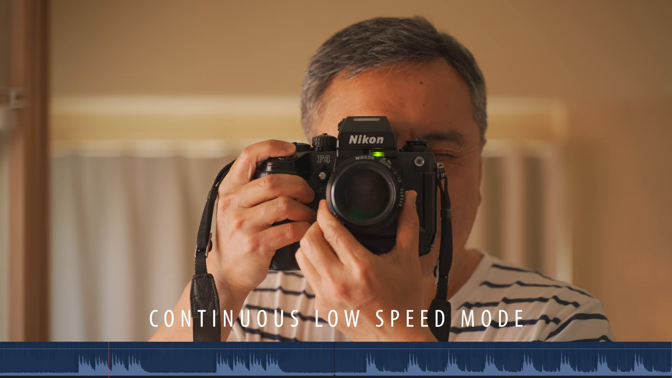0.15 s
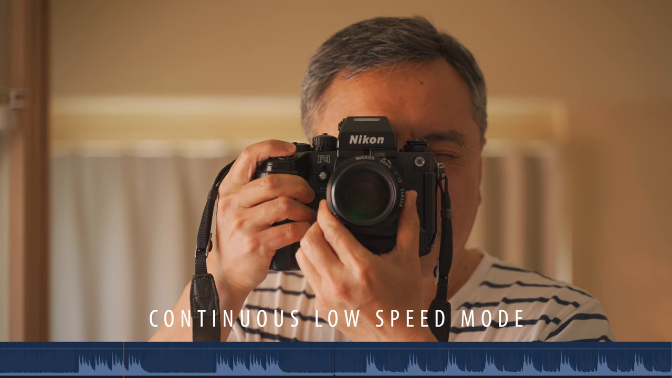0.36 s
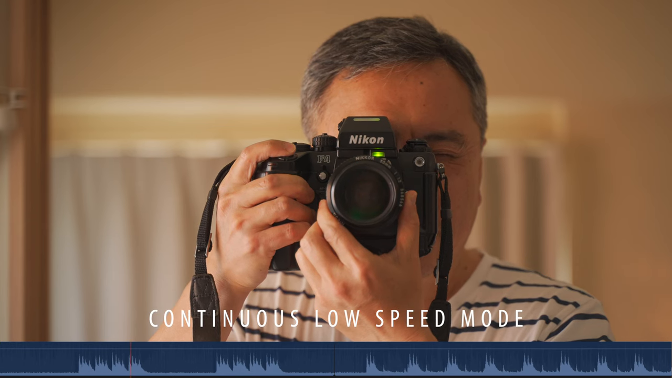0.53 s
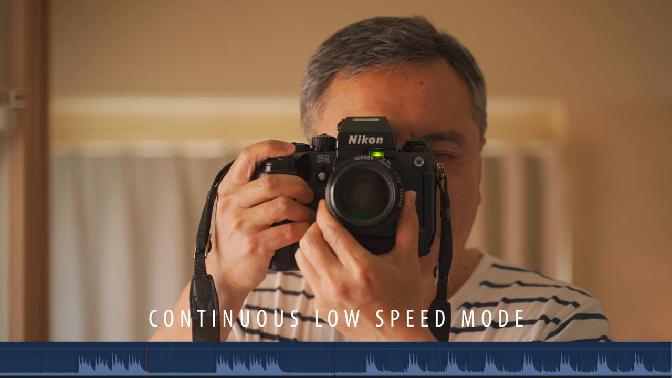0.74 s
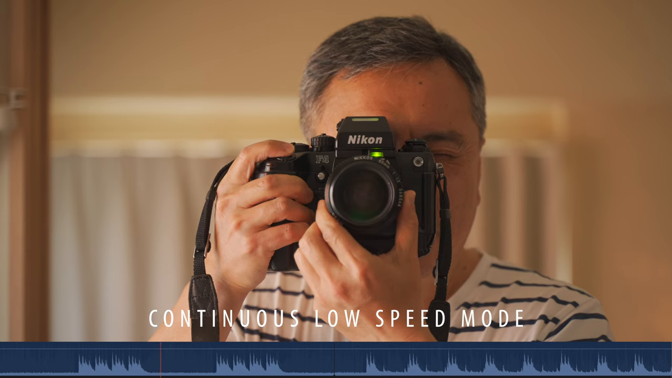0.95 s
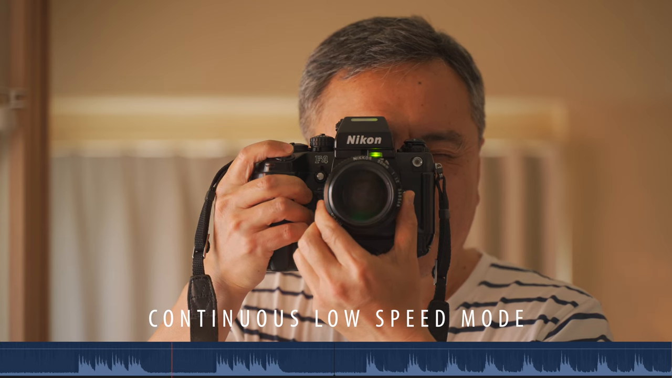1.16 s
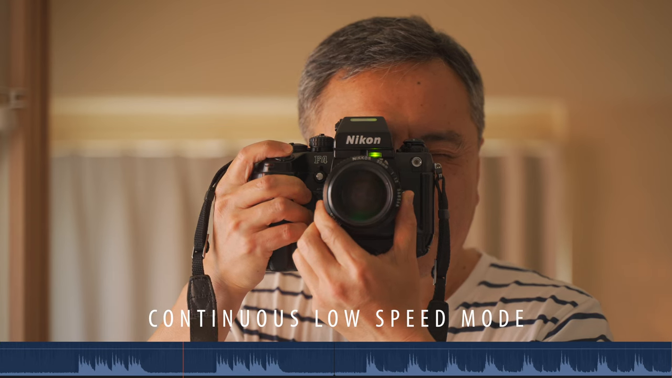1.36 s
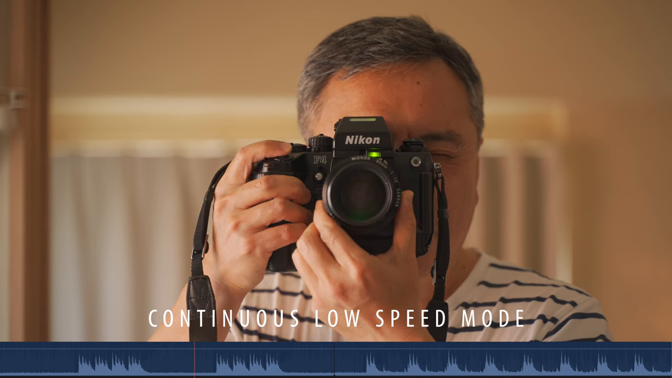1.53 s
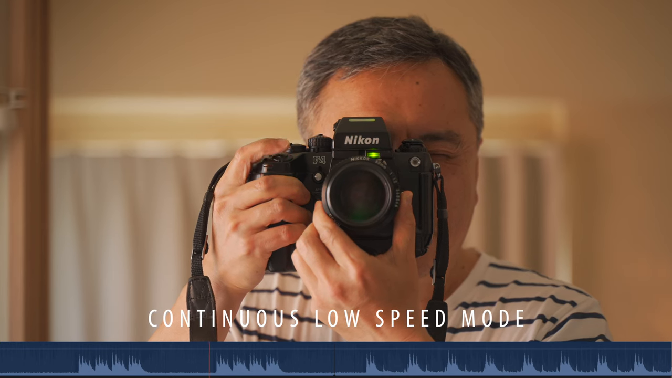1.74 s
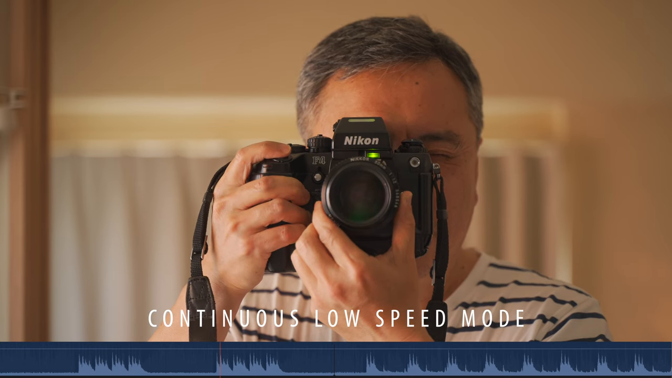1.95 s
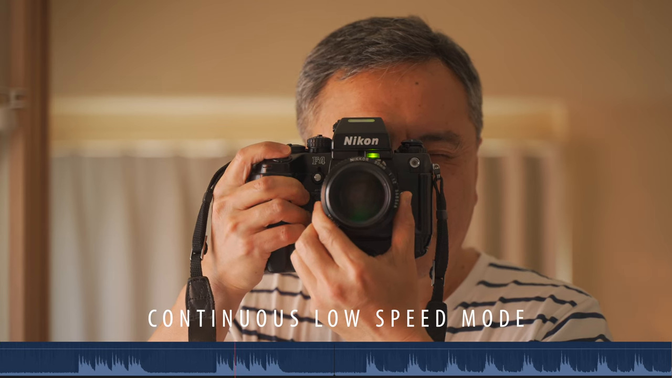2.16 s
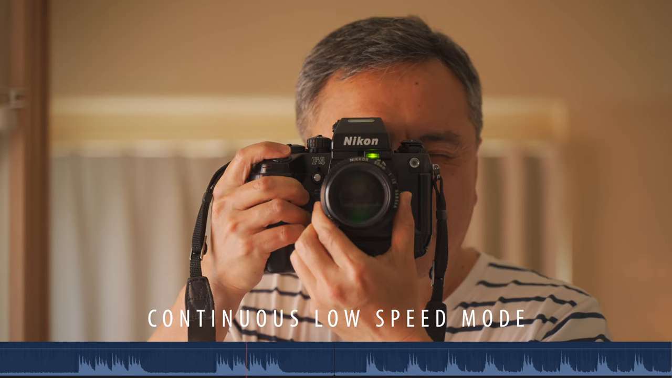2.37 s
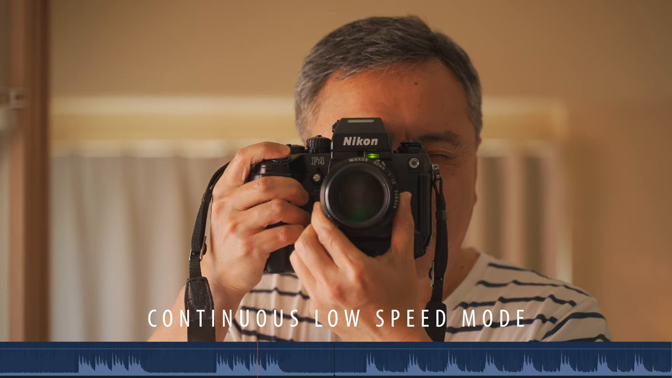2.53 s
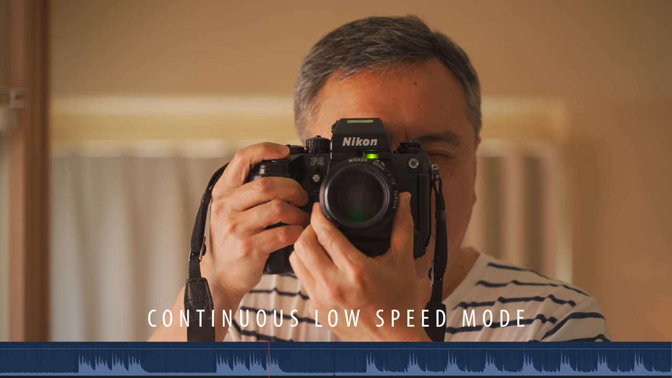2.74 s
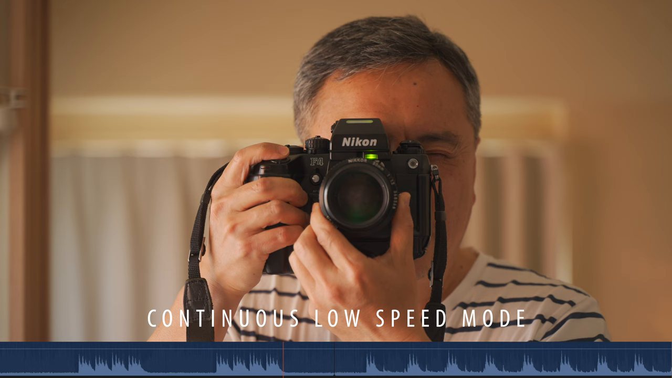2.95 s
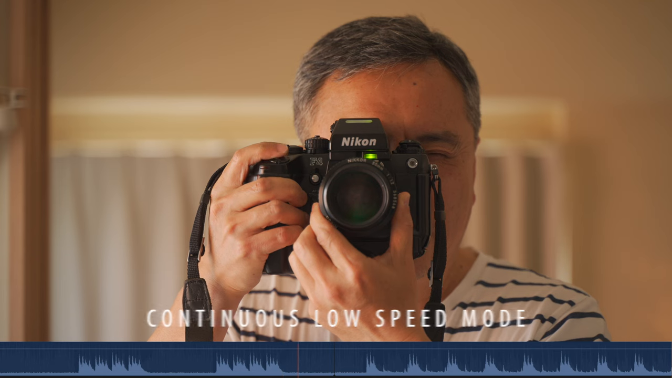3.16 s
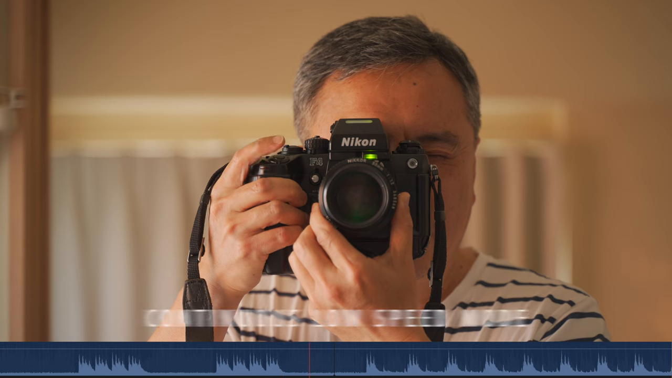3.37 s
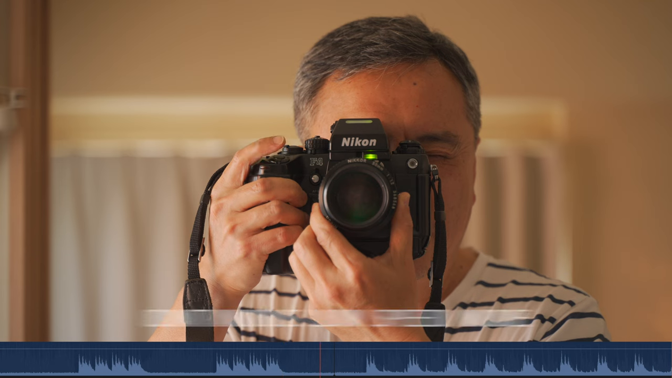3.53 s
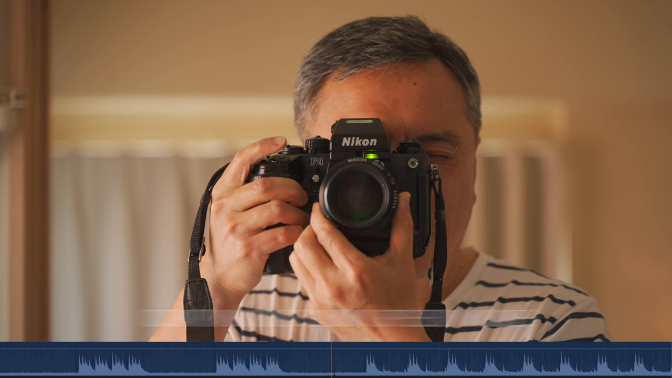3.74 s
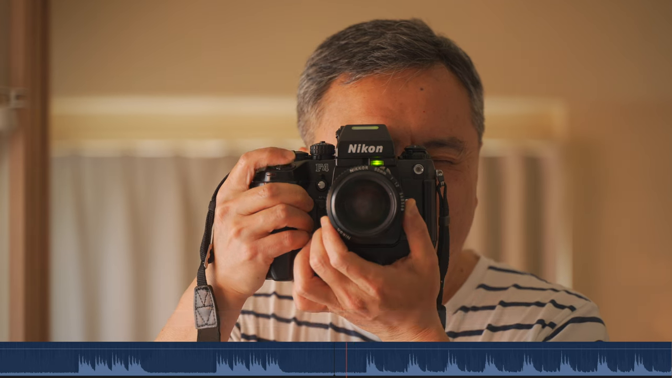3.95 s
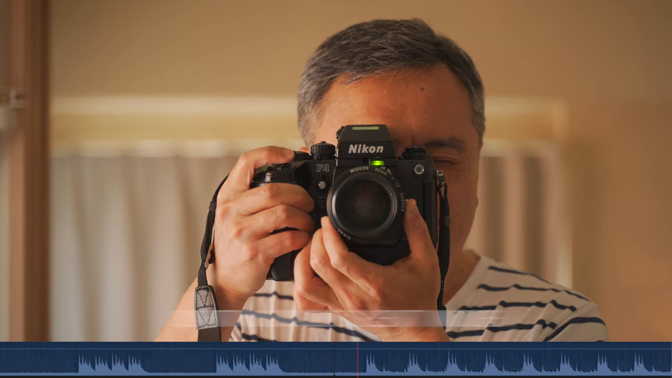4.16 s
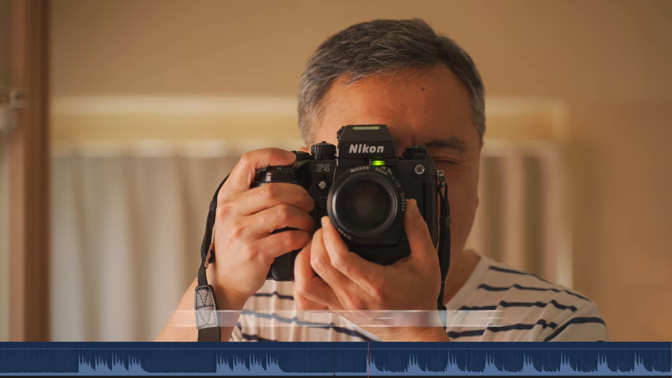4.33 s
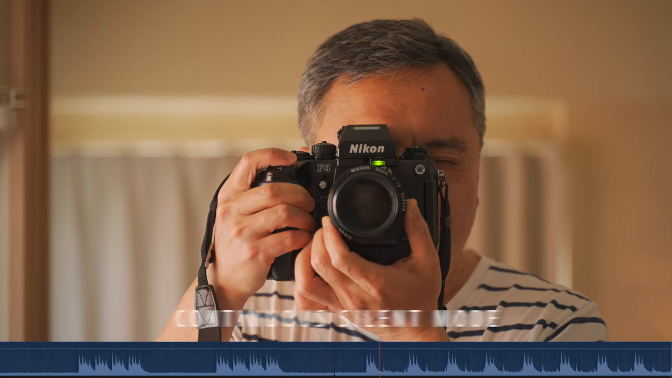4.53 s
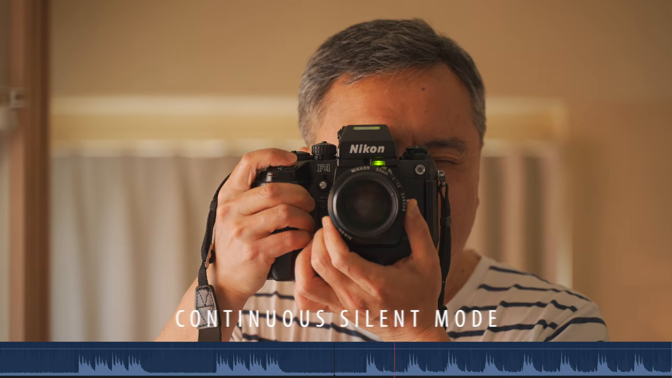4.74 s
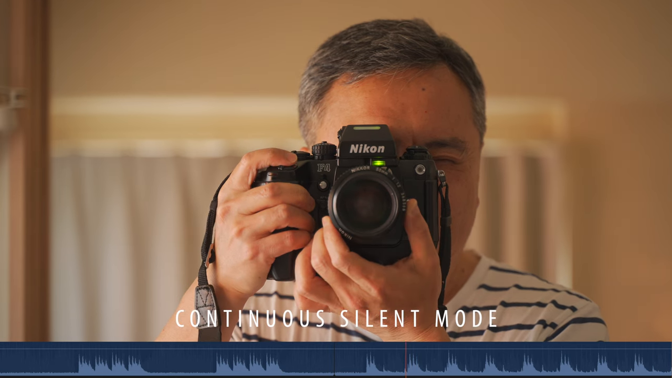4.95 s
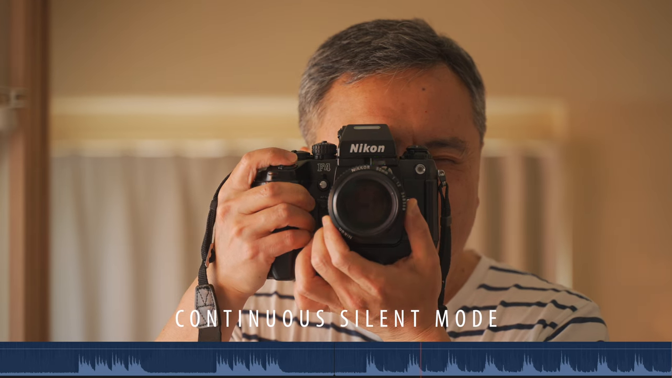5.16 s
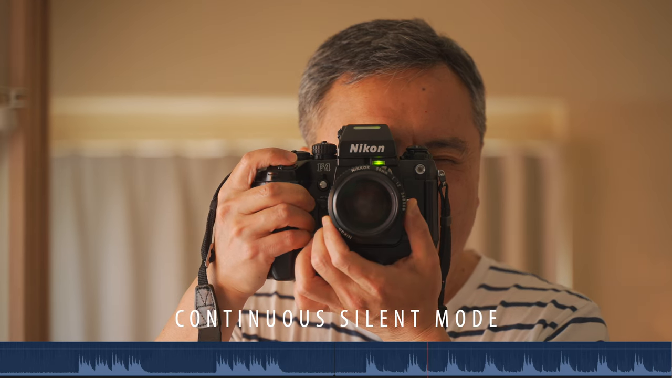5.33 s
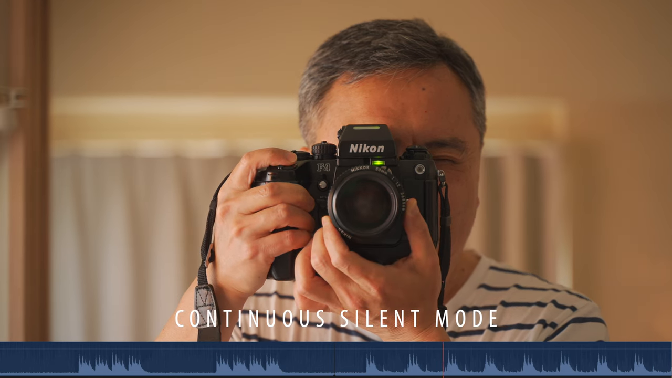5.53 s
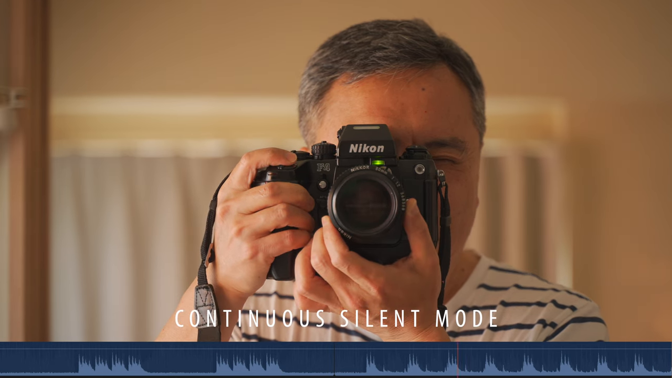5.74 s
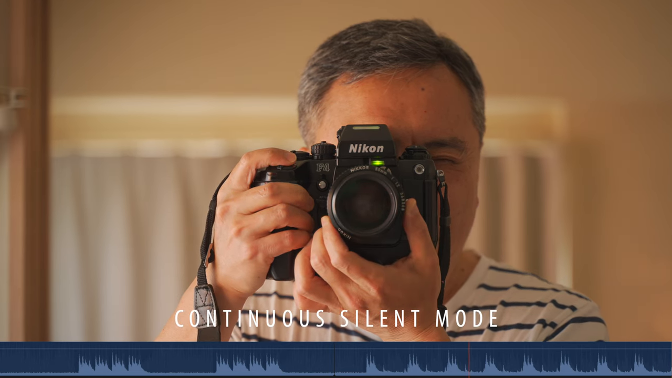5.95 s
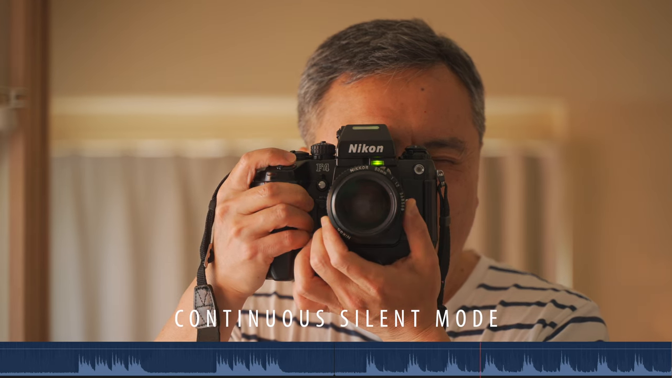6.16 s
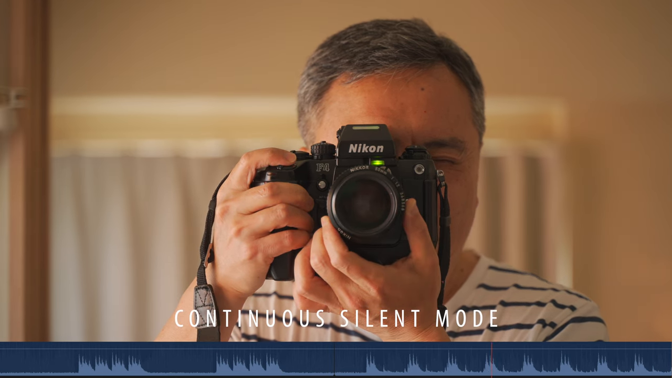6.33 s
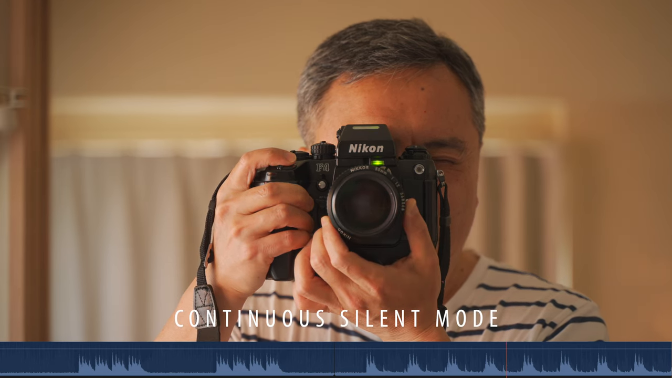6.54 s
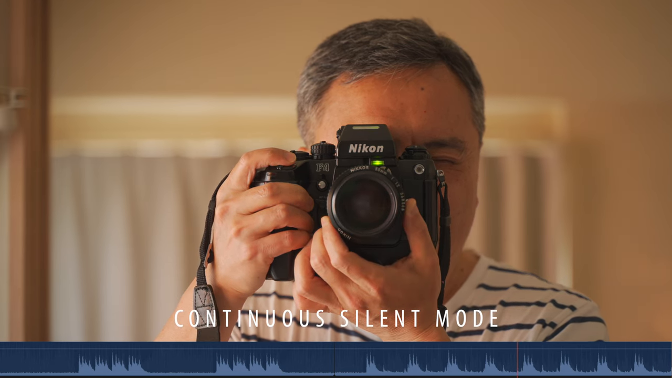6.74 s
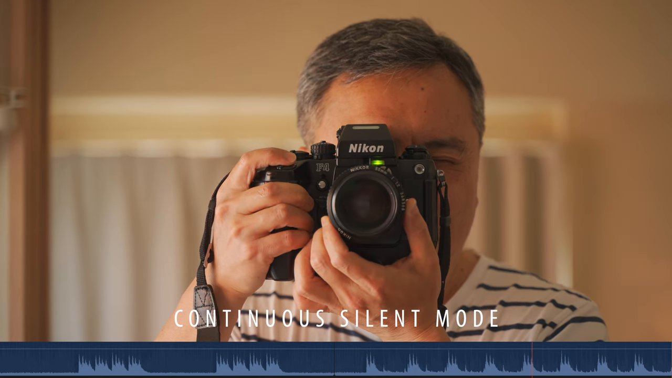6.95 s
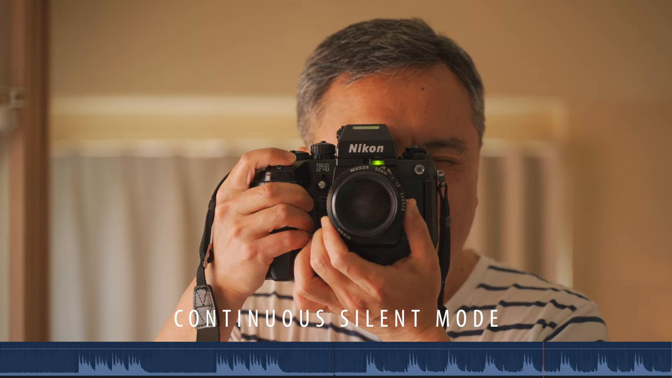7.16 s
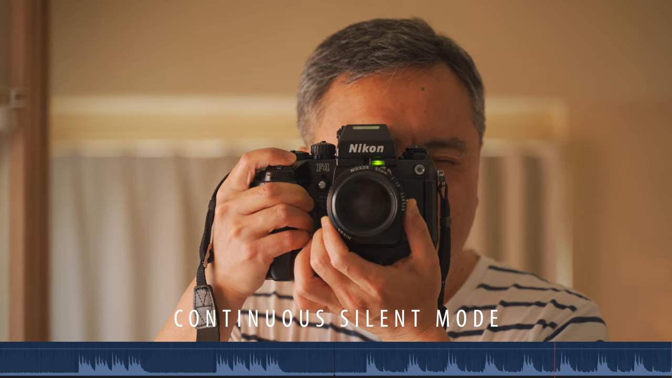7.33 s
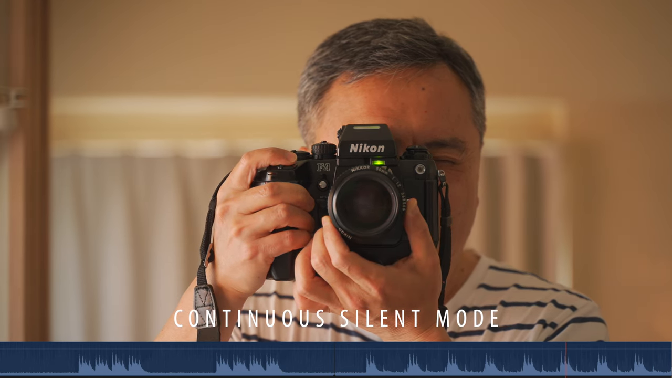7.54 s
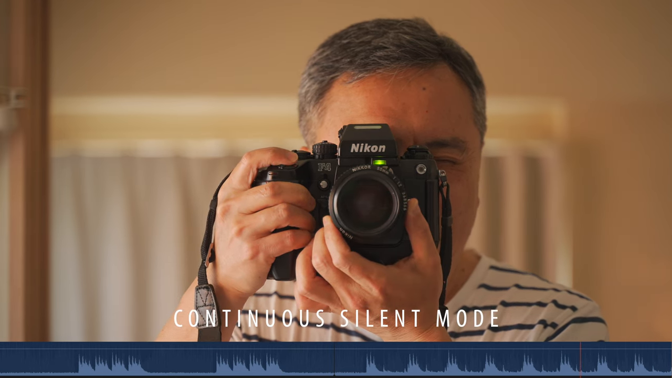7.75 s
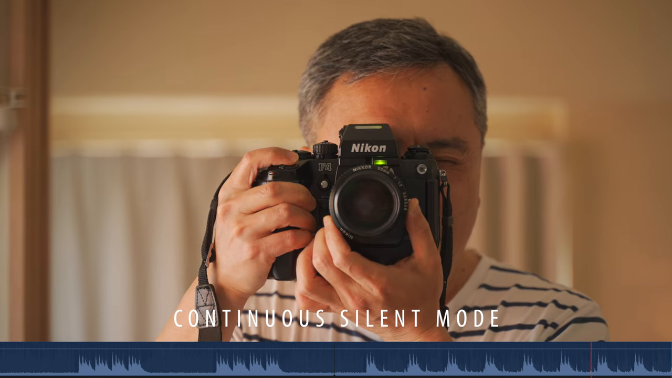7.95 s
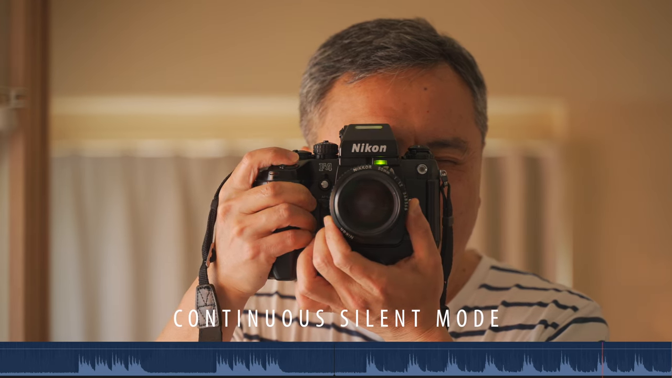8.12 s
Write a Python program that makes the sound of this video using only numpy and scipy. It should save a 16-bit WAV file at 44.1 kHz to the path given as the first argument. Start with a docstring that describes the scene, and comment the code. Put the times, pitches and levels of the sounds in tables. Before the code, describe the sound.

Crisp metallic mirror slaps and shutter clacks from a motor-driven film camera, recorded close with a short room tail. Two rapid bursts, separated by about a second of quiet air, sound dense and whirring, each frame ending in a knock. Later, six slower shots come roughly every six tenths of a second; between them the film creeps forward with fine high ticks, a latch snap, soft knocks and a stop clack.

```python
"""A film camera fires in a small quiet room: two fast bursts, then six slow shots. In each shot a magnet releases,
the mirror flies up, the shutter runs and the mirror drops: impacts of filtered noise that excite the body's modes.
A motor whirrs as it recharges the springs. The fast film advance ends in a knock; the slow one creeps on between
shots, noise with gear ticks (decaying sines), a latch, a pawl and soft knocks. Random decaying tails make the
room's answer; under all lies steady air noise with two low narrow-band tones of uneven level."""
import sys
import numpy as np
from scipy import signal
from scipy.fft import rfft, irfft
from scipy.io import wavfile

SR = 44100
rng = np.random.default_rng(int(sys.argv[2]) if len(sys.argv) > 2 else 0)


def makeup_ratio(level_db):
    """Linear amplitude ratio for a level in decibels (20 dB per factor of ten)."""
    decades = np.asarray(level_db, float) / 20
    return 10 ** decades


def digitize_waveform(pressure):
    """Quantize a signal to 16-bit integers and store it at the path in sys.argv[1].

    Rows of a 2-D input are taken as channels; values are limited to [-1, 1].
    """
    field = np.atleast_2d(pressure).T
    bounded = np.clip(field, -1, 1)
    quanta = np.round(bounded * 32767).astype(np.int16)
    wavfile.write(sys.argv[1], SR, quanta)


N = 361174
LEAD = SR // 4  # samples of run-up before time zero
TIME = (np.arange(N + LEAD) - LEAD) / SR  # [s]


def along(points, hz):
    """Logarithmic frequency axis: interpolates (frequency [Hz], value) points."""
    f, v = np.transpose(points)
    return np.interp(np.log(hz + 1), np.log(f + 1), v)


def unit(x):
    """Power normalization: scales to rms 1."""
    return x / np.sqrt(np.mean(x ** 2))


def envelope(at, times, levels_db):
    """Exponential envelope: straight lines in dB between breakpoints, all but silent outside them."""
    return makeup_ratio(np.interp(at, times, levels_db, left=-120, right=-120))


# resonances of the camera body: (frequency [Hz], bandwidth [Hz], relative level [dB])
BODY_MODES = [(517, 39, 8), (886, 36, 5.5), (1255, 77, 0), (1600, 37, -1.5), (2023, 84, -1.5),
              (2720, 220, -4.5), (4430, 180, -6.5), (5220, 30, -6), (6060, 85, -3.5), (6570, 200, -5.5),
              (8500, 47, -2), (9070, 90, -1.5), (10000, 240, -7)]
HZ = np.fft.rfftfreq(8192, 1 / SR)  # frequency grid of the filters


def coloured(x, spectrum, body_share=0., extra_db=0.):
    """Minimum-phase filtering: a spectrum with body resonances; keeps white-noise power before extra_db."""
    ring = sum(makeup_ratio(2 * db) / (1 + (2 * (HZ - centre) / width) ** 2) for centre, width, db in BODY_MODES)
    gain = unit(makeup_ratio(along(spectrum, HZ)) * np.sqrt(1 + body_share * ring))
    gain = gain * makeup_ratio(extra_db)
    # folding the cepstrum onto positive times makes the filter causal
    cepstrum = irfft(np.log(gain + 1e-6))
    cepstrum[1:len(HZ) - 1] *= 2
    cepstrum[len(HZ):] = 0
    impulse_response = irfft(np.exp(rfft(cepstrum)))
    return signal.oaconvolve(x, impulse_response)[:len(x)]


def grit(rough_db, size):
    """Random amplitude modulation: noise whose level jumps every few samples, as many tiny metal contacts."""
    jumps = np.repeat(rng.standard_normal((N + LEAD) // size + 1), size)[:N + LEAD]
    return unit(rng.standard_normal(N + LEAD) * makeup_ratio(rough_db * jumps))


# loose parts rattle duller than the blow that shook them: (frequency [Hz], level [dB])
LOOSE_PARTS = [(400, -8), (1200, -3), (2000, -3.5), (2800, -1), (4000, -1.5), (10000, -4.5), (15000, -6.5)]


def contacts(events, spectrum, rise, t60, rattle_db, rattle_t60, trim_db, knock_db):
    """Impact excitation: each contact swells, cracks, knocks the body and leaves loose parts rattling."""
    crack, rattle, knock = np.zeros((3, N + LEAD))
    for s, db in events:
        start = max(round((s - .02) * SR) + LEAD, 0)
        span = slice(start, start + SR // 5)
        u = TIME[span] - s - rise  # time from the peak [s]
        level = db + trim_db
        crack[span] += makeup_ratio(level + np.where(u < 0, 20 * u / rise, -60 * u / t60))
        rattle[span] += makeup_ratio(level + rattle_db - 60 * u / rattle_t60) * (u > 0)
        knock[round((s + rise) * SR) + LEAD] = makeup_ratio(level + knock_db)
    noise = grit(rough_db=1.5, size=12)
    low_pass = signal.butter(2, 2 * 3300 / SR)
    high_pass = signal.butter(2, 2 * 3300 / SR, "high")
    # the low body modes get one clean push, alike at every blow; the treble is a scatter of small contacts
    blow = signal.lfilter(*low_pass, knock) + signal.lfilter(*high_pass, crack * noise)
    loose = coloured(rattle * noise, spectrum, 0.44, along(LOOSE_PARTS, HZ))
    return coloured(blow, spectrum, body_share=8.6) + loose


def after_each(events, steps):
    """Repeated pattern: the same steps (delay [s], relative level [dB]) follow every event, whatever its timing."""
    return [(s + lag, db + under) for s, db in events for lag, under in steps]


# first mirror hit of each fast burst: time [s]; its shots follow at a steady pace
BURST_STARTS = [-0.1339, 2.0931]
SHOTS_PER_BURST, FRAME_S, FAST_DB = 4, .2685, -7  # frame period [s], mirror hit [dB before trim]
FAST_SHOTS = [(s + k * FRAME_S, FAST_DB) for s in BURST_STARTS for k in range(SHOTS_PER_BURST)]
# mirror hits its upper stop: (time [s], level [dB before trim])
SLOW_SHOTS = [(4.5143, -6.5), (5.2052, -6), (5.8355, -6), (6.4465, -6), (7.0608, -6.5), (7.6585, -5.5)]
# release step: (time from the mirror hit [s], level relative to it [dB])
RELEASE_STEP = (-0.00196, -14.5)
# colour of release and rising mirror: (frequency [Hz], level [dB per Hz])
MIRROR_UP_COLOUR = [(180, -65), (300, -26), (526, -16.5), (663, -8.5), (908, -5), (1200, -4.5),
                    (1620, -2.5), (2750, 2), (4230, -8), (6600, -3), (11800, -8.5), (15600, -22.5)]


def release():
    """Impact: the release magnet clicks just before the mirror hit."""
    return contacts(after_each(FAST_SHOTS + SLOW_SHOTS, [RELEASE_STEP]), MIRROR_UP_COLOUR, rise=.0005, t60=.08,
                    rattle_db=-15, rattle_t60=.06, trim_db=-6, knock_db=8)


def mirror_up():
    """Impact: the mirror is stopped at the top of its swing and shakes the body."""
    return contacts(FAST_SHOTS + SLOW_SHOTS, MIRROR_UP_COLOUR, rise=0.000826, t60=0.03,
                    rattle_db=-3, rattle_t60=0.14, trim_db=-9.5, knock_db=12.7)


# room: (frequency [Hz], t60 [s], relative level sent to the reverberation [dB])
ROOM_DECAY = [(300, 0.21, -0.5), (776, 0.24, 3), (1660, 0.36, -1), (2820, 0.41, -4.5), (3500, 0.37, -1.5),
              (8040, 0.33, 1.5), (13900, 0.26, -1.5)]


def room(x):
    """Diffuse reverberation: random tails in which each frequency dies at its own speed."""
    step = SR // 8  # a fresh tail each eighth of a second keeps the reverberation from ringing in steady lines
    out = np.zeros(len(x) + SR)
    f, t60, db = np.transpose(ROOM_DECAY)
    noise = rng.standard_normal((len(x) // step + 1, SR // 3))
    hz, t, z = signal.stft(noise, SR, nperseg=256)
    decay = makeup_ratio(-60 * t / np.interp(hz, f, t60)[:, None])
    tails = signal.istft(z * decay, SR, nperseg=256)[1]
    for k, tail in enumerate(tails):
        wet = signal.fftconvolve(x[k * step:(k + 1) * step], tail / np.linalg.norm(tail))
        out[k * step + 160:][:len(wet)] += wet  # 160 samples before the first reflection
    return coloured(out[:len(x)], np.transpose([f, db]))


# shutter steps: (time after the mirror hit [s], level relative to it [dB])
SHUTTER_STEPS = [(.049, -14), (0.0539, 1), (.0565, -4.5), (.061, -9.5)]
# colour of the blinds in fast and slow shots: (frequency [Hz], level [dB per Hz])
FAST_BLINDS_COLOUR = [(180, -44), (300, -23), (879, -7), (1620, -9), (2800, -7.5), (3520, -10), (4370, -4),
                      (4900, -9.5), (6080, -10), (7660, -10.5), (8750, -10.5), (15600, -25.5)]
SLOW_BLINDS_COLOUR = [(180, -61), (300, -16), (879, -3.5), (1620, -5), (2010, -2), (3580, -6), (5240, -2.5),
                      (5600, -7.5), (8750, -5.5), (9500, -15), (10300, -9), (15600, -25)]


def shutter():
    """Successive impacts: the shutter blinds run and strike, coloured differently in fast and slow shots."""
    groups = (FAST_SHOTS, FAST_BLINDS_COLOUR), (SLOW_SHOTS, SLOW_BLINDS_COLOUR)
    return sum(contacts(after_each(group, SHUTTER_STEPS), colour, rise=.003, t60=0.019,
                        rattle_db=-8.5, rattle_t60=0.066, trim_db=-10.5, knock_db=12.4)
               for group, colour in groups)


# charging motor runs:
# (start, two breakpoints near full level, standstill: time after the mirror hit [s]; level [dB rms])
FAST_RUNS = [(0.047, 0.091, 0.11, 0.14, -30), (0.123, 0.173, .167, 0.193, -29.5)]
SLOW_RUNS = [(0.048, 0.076, .13, .19, -32.5)]
RISE_DB, COAST_DB = 5.5, 28  # how far under full level a run starts and ends [dB]
# colour of the loud gears: (frequency [Hz], level [dB per Hz])
GEAR_COLOUR = [(240, -36), (400, -11), (695, -10), (944, -5.5), (1690, -6), (2230, 0.5), (2480, -0.5),
               (2720, -3.5), (2980, -3.5), (8710, -9.5), (12600, -16), (15600, -29.5)]


def whirr():
    """Gear-mesh noise: the motor recharges the springs in each shot, its level rising and then falling away."""
    level = np.zeros(N + LEAD)
    for group, runs in ((FAST_SHOTS, FAST_RUNS), (SLOW_SHOTS, SLOW_RUNS)):
        for *times, db in runs:
            for s, _ in group:
                level += envelope(TIME - s, times, [db - RISE_DB, db, db, db - COAST_DB])
    return coloured(level * grit(rough_db=2.5, size=30), GEAR_COLOUR, body_share=0.8)


# mirror drop and bounce: (time after the mirror hit [s], level relative to it [dB])
FAST_DROP_STEPS = [(0.1026, -1.5), (0.119, -8.5)]
SLOW_DROP_STEPS = [(.110, -2.5), (0.132, -17)]
# colour of the falling mirror: (frequency [Hz], level [dB per Hz])
MIRROR_DOWN_COLOUR = [(180, -58), (300, -33), (1000, -25), (1620, -1), (2330, -14), (2800, 4.5),
                      (3140, -1.5), (4990, -15), (6280, -13.5), (6940, -14.5), (10300, -12), (15600, -29)]


def mirror_down():
    """Impact and rebound: the mirror drops onto its rest and bounces once."""
    drops = after_each(FAST_SHOTS, FAST_DROP_STEPS) + after_each(SLOW_SHOTS, SLOW_DROP_STEPS)
    return contacts(drops, MIRROR_DOWN_COLOUR, rise=0.001011, t60=0.047,
                    rattle_db=-16.0, rattle_t60=0.11, trim_db=-7.5, knock_db=16.6)


# colour of the hush: (frequency [Hz], relative level [dB per Hz])
HUSH_COLOUR = [(15, -43), (28, -8), (40, -10.5), (52, -4), (107, -4.5), (183, -8.5), (216, -8.5),
               (400, -12), (510, -6), (829, -15), (898, -14), (1060, -16), (1580, -23.5), (1710, -24.5),
               (3360, -33), (15600, -38.5)]
HUSH_DB = -51  # [dB rms]
# low two-tone hum; its uneven levels are random fluctuation of narrow-band background noise:
# (time [s], peak level near 100 Hz [dB], peak level near 215 Hz [dB])
HUM_LEVELS = [(0, -54.5, -64), (1.6, -60, -67), (2.2, -53.5, -62), (2.5, -66, -65.5), (3.9, -64, -65.5),
              (4.06, -49, -57), (5.3, -62.5, -58.5), (6.25, -52, -56.5), (6.45, -59.5, -59),
              (8.19, -60.5, -63)]


def hush():
    """Stationary broadband noise and fluctuating narrow-band noise: steady air under a low two-tone hum."""
    air = makeup_ratio(HUSH_DB) * unit(coloured(rng.standard_normal(N), HUSH_COLOUR))
    t = np.arange(N) / SR
    s, *levels = np.transpose(HUM_LEVELS)
    for hz, db in zip((101, 215), levels):
        drift = np.cumsum(rng.standard_normal(N)) * np.sqrt(9 / SR)  # random walk of phase
        air = air + makeup_ratio(np.interp(t, s, db)) * np.sin(2 * np.pi * hz * t + drift)
    return air


# the fast advance jams tooth by tooth: (time after the mirror hit [s], level relative to it [dB])
FAST_STOP_STEPS = [(.159, -16), (.162, -7), (0.1639, -4), (0.169, -5.5), (.179, -16)]
# colour of the stop: (frequency [Hz], level [dB per Hz])
STOP_THUD_COLOUR = [(180, -58), (300, -16), (509, -11.5), (923, -6), (1370, -5), (1590, -3.5), (1820, -4.5),
                    (2700, -3), (3700, -8), (6940, -6), (11800, -16), (15600, -27)]


def fast_stop():
    """Impact series: the fast film advance jams and knocks at the end of each frame."""
    return contacts(after_each(FAST_SHOTS, FAST_STOP_STEPS), STOP_THUD_COLOUR, rise=0.00276, t60=0.014,
                    rattle_db=-12.5, rattle_t60=0.14, trim_db=-10.5, knock_db=16.7)


# a faint click of the dial between the modes: (time [s], level [dB before trim])
DIAL_CLICK = [(4.008, -44)]
# pawl of the slow advance: (time [s], level [dB before trim])
PAWL_TAPS = [(5.1274, -19), (5.7803, -19.5), (6.4074, -17), (7.015, -19), (7.5876, -17.5)]
# colour of both: (frequency [Hz], level [dB per Hz])
PAWL_COLOUR = [(710, -23), (1200, -2.5), (1900, -8.5), (2770, -5.5), (3090, -5.5), (3870, -5), (7130, -18),
               (9120, -13), (15600, -29)]


def dial_and_pawl():
    """Light impacts: the dial clicks once, then the pawl taps near the end of slow advances."""
    return contacts(PAWL_TAPS + DIAL_CLICK, PAWL_COLOUR, rise=.0015, t60=0.038,
                    rattle_db=-6.0, rattle_t60=0.11, trim_db=-13.0, knock_db=11.2)


# starts after the shot [s], [dB rms before waver], strains past the latch [dB], eases [s], wavers [dB]
CREEP_START_S, CREEP_DB, STRAIN_DB, EASE_S, CREEP_WAVER_DB = .19, -56, 3, .13, -1
# colour of the slow gears and spool: (frequency [Hz], level [dB per Hz])
SLOW_GEAR_COLOUR = [(600, -33), (1100, -3.5), (2500, 2), (4000, -8), (6300, -9), (7800, -15), (11000, -18),
                    (13000, -21), (16000, -36)]


def creep():
    """Gear noise under changing load: the slow advance strains past the latch, eases and runs to its stop."""
    stops = [s for s, _ in SLOW_STOPS] + [N / SR]
    levels = CREEP_DB + np.array([0, 0, STRAIN_DB, 0, 0])
    level = np.zeros(N + LEAD)
    for (shot, _), (latched, _), stop in zip(SLOW_SHOTS, LATCH_SNAPS, stops):
        times = [shot + CREEP_START_S, latched, latched + 0.031, latched + EASE_S, stop]
        level += envelope(TIME, times, levels)
    waver_times = np.linspace(TIME[0], TIME[-1], num=120)
    waver = makeup_ratio(CREEP_WAVER_DB * np.interp(TIME, waver_times, rng.standard_normal(120)))
    return coloured(level * waver * grit(rough_db=3.5, size=200), SLOW_GEAR_COLOUR, body_share=.7)


# teeth of the slow gear fall at uneven moments: times [s], one row a frame
TOOTH_TIMES = [
    [4.764, 4.780, 4.8189, 4.8653, 4.9132, 4.9372, 4.9776, 5.0235, 5.0574, 5.0814, 5.1214],
    [5.4405, 5.456, 5.5174, 5.55, 5.5885, 5.6301, 5.658, 5.7024, 5.7174, 5.7673],
    [6.0916, 6.105, 6.1853, 6.231, 6.2522, 6.2877, 6.334, 6.3849],
    [6.6643, 6.7, 6.756, 6.7915, 6.8316, 6.8732, 6.8902, 6.9346, 6.99],
    [7.3068, 7.3337, 7.4056, 7.4355, 7.4764, 7.5118, 7.5617, 7.574],
    [7.885, 7.955, 8.0057, 8.0184, 8.0596, 8.104, 8.117, 8.167],
]
# a gear tooth rings: (nominal frequency [Hz], nominal level [dB], t60 [s])
TOOTH_MODES = [(9700, -4, 0.013), (8700, -6, 0.0068), (10100, -4.5, 0.0074)]
# bounces: (nominal time after the strike [s], nominal level relative to it [dB])
TOOTH_BOUNCES = [(.0058, -3.5), (.013, -10)]
TICK_DB, TICK_SCATTER_DB, SLACK_DB = -35, 1.5, -1.5  # mean level, scatter, softer before the latch [dB]


def ticks():
    """Modal ringing: each slow-gear tooth strikes and bounces twice, ringing small steel with a rough edge."""
    t = np.arange(SR // 40) / SR
    out = np.zeros(N + LEAD + SR)
    strikes = [(s, TICK_DB + TICK_SCATTER_DB * rng.standard_normal() + SLACK_DB * (s < latched))
               for frame, (latched, _) in zip(TOOTH_TIMES, LATCH_SNAPS) for s in frame]
    bounces = [(s + 0.00078 * rng.standard_normal(), db + 3 * rng.standard_normal())
               for s, db in after_each(strikes, TOOTH_BOUNCES)]
    onset = 1 - np.exp(-t / 0.00072)
    for s, db in strikes + bounces:
        luck = rng.standard_normal((len(TOOTH_MODES), 2))  # scatter of level and pitch
        wander = .06 * np.cumsum(rng.standard_normal(len(t)))  # rough phase
        ring = np.zeros(len(t))
        for (hz, level, t60), (louder, higher) in zip(TOOTH_MODES, luck):
            tone = np.sin(2 * np.pi * hz * (1 + higher / 80) * t + wander)
            ring += makeup_ratio(level + 2 * louder - 60 * t / t60) * tone
        out[round(s * SR) + LEAD:][:len(t)] += makeup_ratio(db) * ring * onset
    return out[:N + LEAD]


# latch of the slow advance: (time [s], level [dB before trim])
LATCH_SNAPS = [(4.787, -18), (5.476, -17), (6.109, -17.5), (6.7203, -18.5), (7.3538, -17), (7.8997, -18)]
# its colour: (frequency [Hz], level [dB per Hz])
LATCH_COLOUR = [(710, -30), (1200, -4.5), (1880, -10), (2890, -5), (3220, -15), (4740, -2), (8930, -10),
                (11700, -2), (15600, -19.5)]


def latch():
    """Impact: the latch snaps early in each slow advance."""
    return contacts(LATCH_SNAPS, LATCH_COLOUR, rise=0.00079, t60=0.021,
                    rattle_db=-7, rattle_t60=0.17, trim_db=-11.5, knock_db=9.8)


# soft knocks of the film spool in the slow advance: (time [s], level [dB before trim])
SPOOL_KNOCKS = [(4.853, -28), (4.9855, -30), (5.0624, -39), (5.5598, -30), (5.6675, -30.5), (5.7234, -32.5),
                (6.199, -28.5), (6.299, -39), (6.3435, -31), (6.775, -29.5), (6.947, -28), (7.443, -31),
                (7.5193, -31), (7.9768, -28.5), (8.0696, -38), (8.125, -29.5)]
# a soft knock just before the pawl: (time from the pawl [s], level relative to it [dB])
PAWL_LEAD_STEPS = [(-0.0086, -13)]


def knocks():
    """Soft impacts: a slower rise dulls the knocks of the film spool and those just before the pawl."""
    return contacts(SPOOL_KNOCKS + after_each(PAWL_TAPS, PAWL_LEAD_STEPS), SLOW_GEAR_COLOUR, rise=0.0033, t60=0.066,
                    rattle_db=-3.5, rattle_t60=0.14, trim_db=-10.5, knock_db=5.4)


# stop of the slow advance: (time [s], level [dB before trim])
SLOW_STOPS = [(5.1779, -8.5), (5.81, -9), (6.4298, -8.5), (7.0411, -8), (7.6405, -8.5)]
# its colour: (frequency [Hz], level [dB per Hz])
STOP_CLACK_COLOUR = [(240, -16), (400, 1), (1320, -5), (1610, 2), (1850, -4), (2600, 2), (5420, -6.5),
                     (6510, -3.5), (10200, -6.5), (15600, -27)]


def slow_stop():
    """Impact: the slow advance clacks against its stop."""
    return contacts(SLOW_STOPS, STOP_CLACK_COLOUR, rise=0.0014, t60=0.019,
                    rattle_db=-5.0, rattle_t60=0.11, trim_db=-13.5, knock_db=12.7)


# the motor whines once under load: (from [Hz], to [Hz], peak level [dB], settles relative to that [dB])
WHINE_TONE = (1037.5, 1062, -48.5, -10)
# its (start, peak, settling, end), all times [s]
WHINE_TIMES = (6.62, 6.66, 6.8, 7.02)


def whine():
    """Frequency modulation with phase diffusion: one gliding, unsteady motor tone."""
    low_hz, high_hz, db, settle_db = WHINE_TONE
    wander = np.cumsum(rng.standard_normal(len(TIME))) * np.sqrt(90 / SR)  # unsteady phase
    pitch = np.interp(TIME, WHINE_TIMES, [low_hz, low_hz, high_hz, high_hz])
    level = envelope(TIME, WHINE_TIMES, db + np.array([-20, 0, settle_db, settle_db]))
    return level * np.sin(2 * np.pi * np.cumsum(pitch) / SR + wander)


def scene():
    """Superposition of direct sound, reverberation and hush."""
    shots = release() + mirror_up() + shutter() + mirror_down()
    advance = fast_stop() + dial_and_pawl() + latch() + knocks() + slow_stop()
    motor = whirr() + creep() + whine()
    camera = shots + advance + motor
    teeth = ticks()
    to_room = camera + makeup_ratio(-8) * teeth  # ticks are sent more weakly to the reverberation, so they stay crisp
    sound = camera + teeth + makeup_ratio(-7.0) * room(to_room)
    return (sound[LEAD:] + hush())[None]


def band_limit(x):
    """A steep low-pass at the top of the band."""
    return signal.sosfilt(signal.butter(12, 16650, fs=SR, output="sos"), x)


def record(dry):
    """Band limitation: a steep low-pass at 16.1 kHz finishes the mix."""
    low_pass = signal.butter(12, 2 * 16100 / SR, output="sos")
    mix = signal.sosfilt(low_pass, dry)
    return band_limit(mix)


dry = scene()
out = record(dry)
digitize_waveform(out)
```